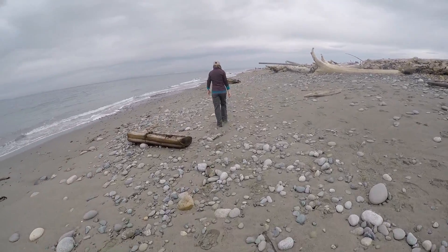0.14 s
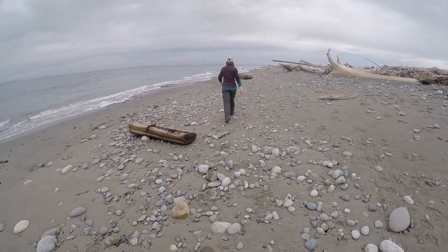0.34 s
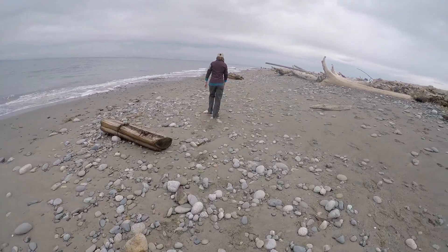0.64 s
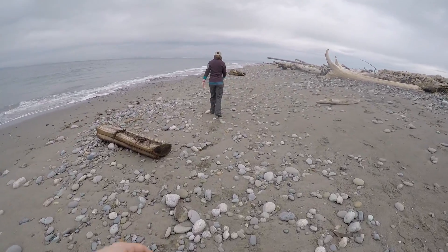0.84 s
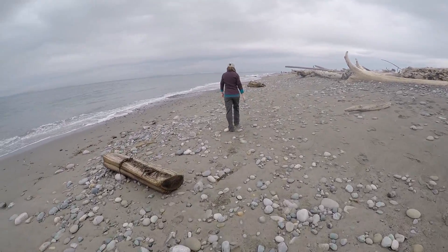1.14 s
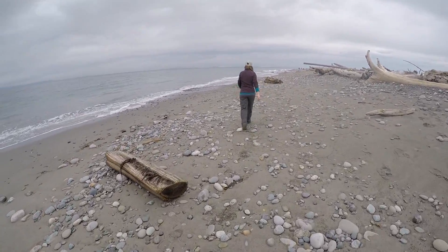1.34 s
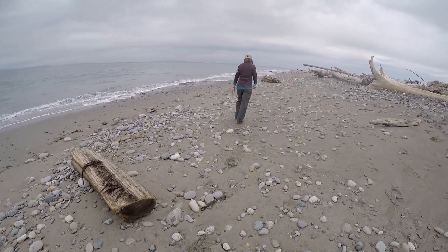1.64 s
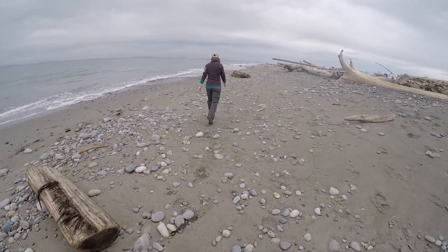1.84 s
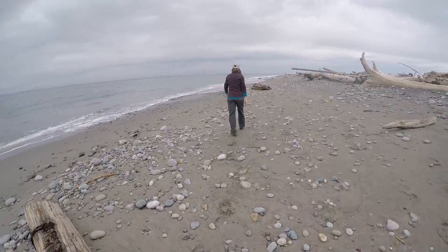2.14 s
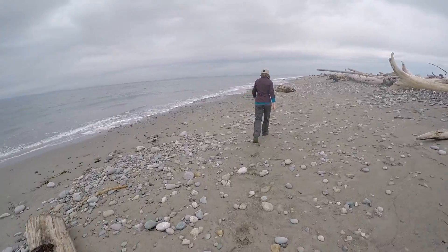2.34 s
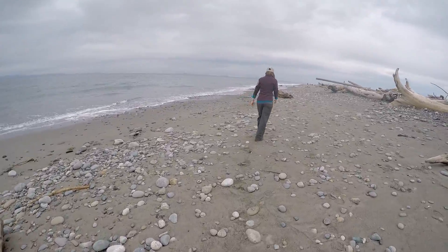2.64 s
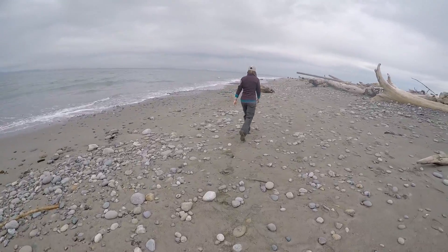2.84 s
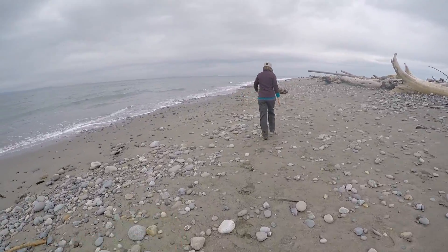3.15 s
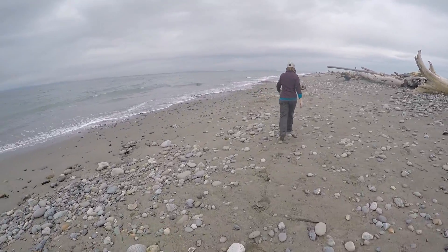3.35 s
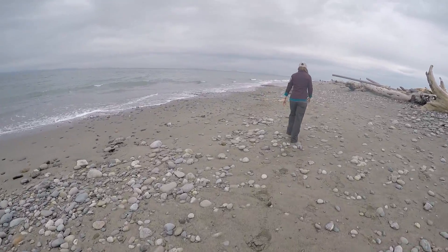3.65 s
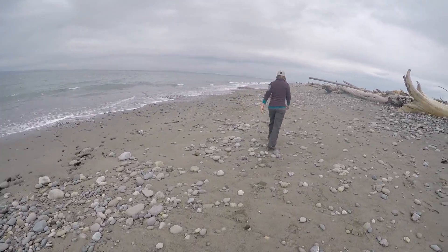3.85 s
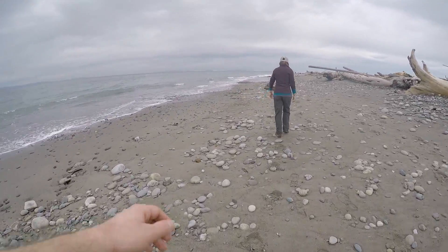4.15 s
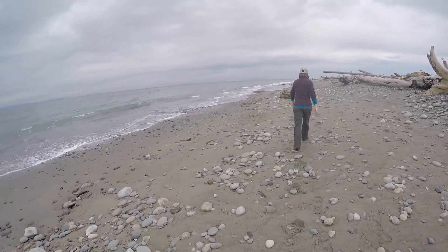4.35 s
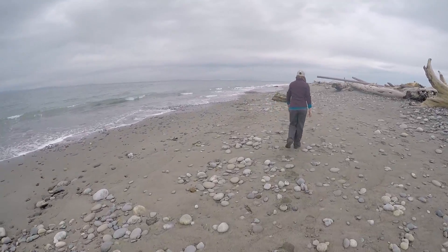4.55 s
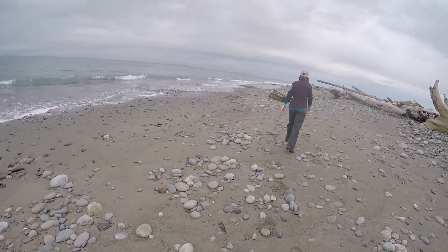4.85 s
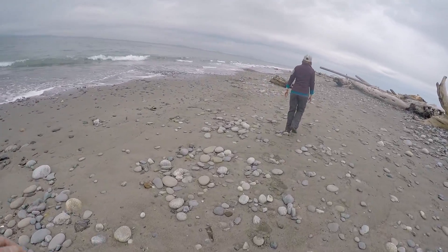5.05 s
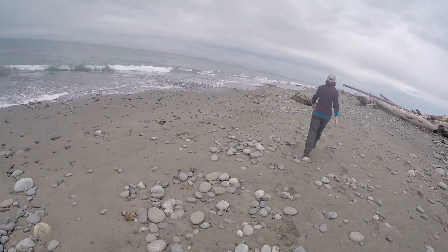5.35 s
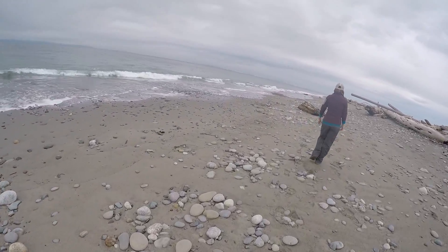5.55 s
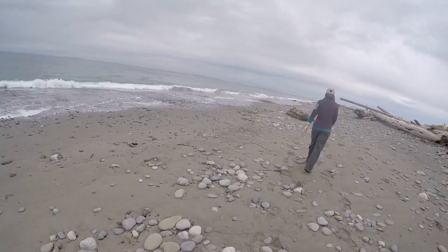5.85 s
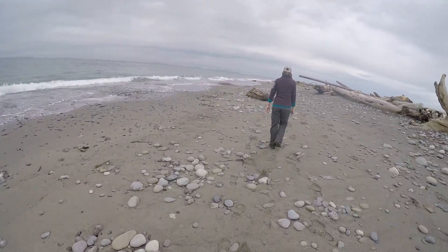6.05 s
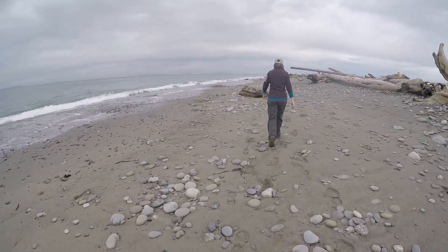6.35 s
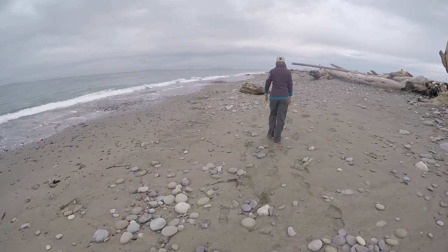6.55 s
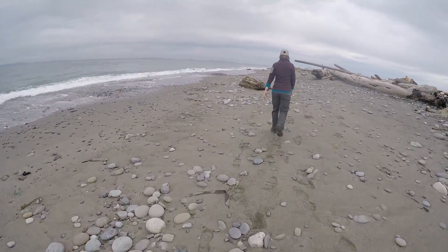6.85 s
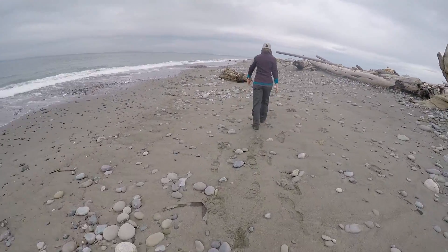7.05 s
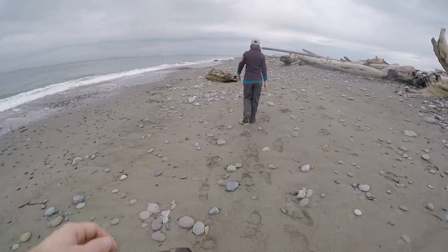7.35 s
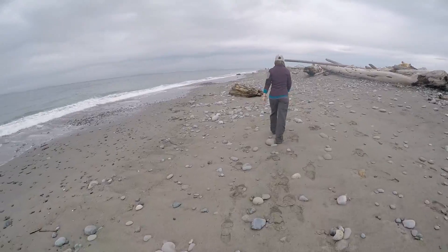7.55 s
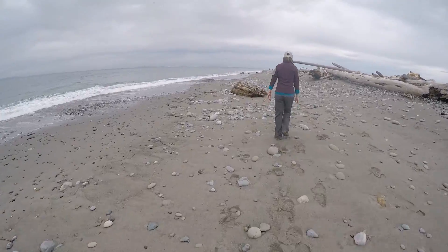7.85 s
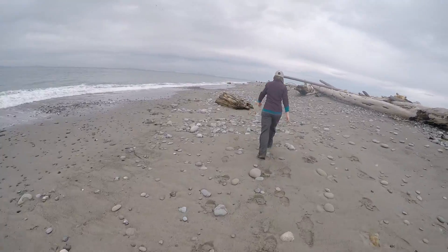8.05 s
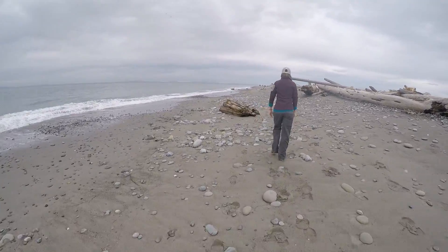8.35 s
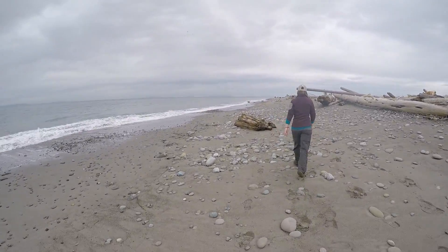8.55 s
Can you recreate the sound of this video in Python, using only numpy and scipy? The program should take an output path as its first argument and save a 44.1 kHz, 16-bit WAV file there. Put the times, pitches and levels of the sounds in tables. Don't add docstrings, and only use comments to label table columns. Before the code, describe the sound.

A walker's camera case knocks, wobbles and ticks with every step on a sand and pebble beach as a wave breaks and fizzes.

```python
import sys
import numpy as np
from scipy import signal
from scipy.fft import rfft, irfft
from scipy.io import wavfile
from scipy.ndimage import uniform_filter1d

SR = 44100
rng = np.random.default_rng(int(sys.argv[2]) if len(sys.argv) > 2 else 0)


def store_wav(level_fs):
    pcm = np.round(np.clip(np.atleast_2d(level_fs), -1, 1) * 32767)
    wavfile.write(sys.argv[1], SR, pcm.T.astype(np.int16))


def invert_db(level):
    return 10 ** (np.asarray(level, dtype=float) / 20)


N = 384111


def rms_one(x):
    return x / np.sqrt(np.mean(x ** 2) + 1e-20)


def in_time(rows):
    s, *columns = np.transpose(rows)
    return [np.interp(np.arange(N) / SR, s, column) for column in columns]


def drift(rate_hz):
    r = np.exp(-80 * np.pi * rate_hz / SR)
    slow = signal.lfilter([1], [1, -2 * r, r * r], rng.standard_normal(N // 40 + 2002))
    slow = rms_one(slow[2000:])
    return np.interp(np.arange(N) / 40, np.arange(len(slow)), slow)


def band(x, low_hz, high_hz):
    return signal.sosfilt(signal.butter(2, [low_hz, high_hz], "band", fs=SR, output="sos"), x)


def shaped(x, points):
    hz = np.maximum(np.arange(N // 2 + 1) * SR / N, 1)
    at_hz, db = np.transpose(points)
    gain = invert_db(np.interp(np.log(hz), np.log(at_hz), db))
    return irfft(rfft(x) * gain, N)


def ring(clicks, hz, t60_s):
    r = invert_db(-60 / (t60_s * SR))
    w = 2 * np.pi * hz / SR
    return signal.lfilter([0, np.sin(w)], [1, -2 * r * np.cos(w), r * r], clicks + 1e-18)


def struck(times, groups, group_db, contact_s, spread_db):
    out, sign = np.zeros(N), 1
    for modes, db in zip(groups, group_db):
        for hz, mode_db, t60_s in modes:
            sign = -sign
            start = times + 0.2 * contact_s * rng.random(len(times))
            strength = invert_db(db + mode_db + spread_db * rng.standard_normal(len(times)))
            clicks = np.zeros(N)
            np.add.at(clicks, (start * SR).astype(int), sign * strength)
            out += ring(clicks, hz, t60_s) - ring(clicks, hz, 3.07 * contact_s)
    return out


def swells(times, dbs, width_s):
    t = np.arange(0, N, 40) / SR
    bells = invert_db(dbs)[:, None] * np.exp(-((t - times[:, None]) / width_s) ** 2 / 2)
    return np.interp(np.arange(N) / SR, t, bells.sum(axis=0))


def case(x):
    # pitch_hz [Hz], width_hz [Hz], level_db [dB]
    resonances = [(590, 200, -19.5), (781, 59, -5), (965, 1130, -14.5), (1830, 178, 6.5), (2333, 174, -1.5),
                  (2697, 80, -0.5), (3500, 236, 0.5), (4190, 506, -5.5), (4490, 420, -18), (5300, 180, -42),
                  (6250, 960, -21), (8140, 670, -26), (8800, 64, -45), (10180, 1380, -12.5),
                  (13500, 670, -18)]
    # pitch_hz [Hz], level_db [dB]
    leak = [(200, -10.5), (1000, -19.5), (1230, -17), (1500, -4), (3000, -17.5), (5000, -18), (9000, -51.5),
            (15000, -23)]
    out = shaped(x, leak)
    for k, (hz, width_hz, db) in enumerate(resonances):
        r = np.exp(-np.pi * width_hz / SR)
        g = (1 - r * r) / 2 * invert_db(db) * (-1) ** k
        out += signal.lfilter([g, 0, -g], [1, -2 * r * np.cos(2 * np.pi * hz / SR), r * r], x)
    notch = signal.iirnotch(4020, 4020 / 120, fs=SR)
    return out - 0.58 * (out - signal.lfilter(*notch, out))


def surf():
    # start_s [s], level_db [dB]
    wave = [(0.0, -55), (0.48, -52.5), (0.9, -55.5), (2.52, -59), (3.13, -63), (3.71, -57.5), (4.4, -55.5),
            (4.6, -51), (4.8, -49.5), (5.31, -47.5), (5.6, -46), (6.02, -48), (6.55, -47.5), (7.08, -47.5),
            (8.39, -51.5), (8.71, -51.5)]
    # middling_db [dB], share of its swing [ratio], lag_s [s], far_sea_db [dB]
    layers = [
        (-50.5, 1.18, 0.001, -66.5),
        (-58, 1.55, 0.35, -64),
        (-59.5, 1.5, 0.0041, -70),
        (-74.5, 1.6, 0.33, -99),
    ]
    # start_s [s], level_db [dB]
    fizz = [
        (0, -2),
        (4.4, 0.5),
        (4.7, 5.5),
        (5.3, 3.5),
        (5.7, 2.5),
        (6.2, 3),
        (6.9, -1.5),
        (7.2, -5),
        (7.8, -0.5),
        (8.71, 8),
    ]
    fizz_shares = [0.042, 0.18, 0.54, 0.47]
    # start_s [s], level_db [dB]
    crests = [
        (4.55, 1.8),
        (5.25, 4.0),
        (7.4, 2.9),
        (8.3, 2.5),
    ]
    crest_shares = [0.24, 0.094, .4, 0.93]
    bands_hz = [(1494, 3590), (143, 1258), (3950, 7950), (8100, 18000)]
    t = np.arange(N) / SR
    crest_db = np.zeros(N)
    for s, db in crests:
        age = np.maximum(t - s, 0)
        crest_db += db * (1 - np.exp(-age / 0.12)) * np.exp(-age / 0.7)
    fizz_db = in_time(fizz)[0]
    vigour = in_time(wave)[0] + 50
    out = np.zeros(N)
    for layer, fizzy, misty, (low, high) in zip(layers, fizz_shares, crest_shares, bands_hz):
        mid_db, share, lag_s, far_db = layer
        late = np.interp(t - lag_s, t, vigour)
        late = uniform_filter1d(late, max(int(1.6 * lag_s * SR), 1), mode="nearest")
        near_db = mid_db + share * late + misty * crest_db + fizzy * fizz_db
        level = np.hypot(invert_db(near_db), invert_db(far_db))
        flicker_db = 0.5 * drift(0.11) + 0.76 * drift(19.0) + 0.91 * drift(2.4)
        hiss = band(band(rng.standard_normal(N), low, high), 0.81 * low, 1.1 * high)
        out += rms_one(case(hiss)) * level * invert_db(flicker_db)
    return out


def pebbles():
    # start_s [s], peak_db [dB], pitch_hz [Hz]
    pebble_hits = [(1.514, -38, 1650), (1.516, -38, 3470), (1.998, -39.5, 2310), (2.6269, -50, 2640),
                   (2.852, -46, 2340), (2.908, -43, 2370), (2.237, -42, 2520), (3.778, -49, 1100),
                   (.6635, -42, 2570), (1.19, -41, 2450), (1.75, -43, 2400), (2.761, -47, 2600),
                   (2.77, -42, 1920), (2.7705, -48, 2600), (3.842, -37, 2400), (7.056, -39, 2570),
                   (3.145, -45, 1900), (3.347, -45, 2250), (1.4378, -45, 2190), (1.4662, -42, 2320),
                   (1.5355, -42, 3430), (1.5352, -36, 1760), (1.5805, -37, 1800), (1.6155, -36, 3600),
                   (3.126, -44, 2350), (3.247, -44, 2340), (3.261, -43, 2380), (3.268, -46, 2300),
                   (3.334, -49, 2250), (3.237, -50, 2300), (3.298, -43, 2330), (1.472, -42, 2500),
                   (1.484, -42, 2400), (1.495, -48, 2500), (1.523, -39, 2200), (1.545, -44, 2000),
                   (4.325, -43, 2350), (1.269, -47, 4180), (8.446, -46, 2450), (3.5267, -37.5, 2370),
                   (3.5448, -37, 2280), (3.5576, -35.5, 3500), (3.5902, -47, 2360), (4.6089, -38, 2360),
                   (6.574, -33, 2280), (6.7281, -39, 2240), (8.4367, -43, 2390), (8.455, -38, 2590)]
    out = np.zeros(N)
    for s, db, hz in pebble_hits:
        out += struck(np.array([s]), [[(hz, 0, 0.018)]], [db], 0.00034, 0)
    scatter = (rng.random(N) < 40 / SR) * invert_db(-52.0 + 0.79 * rng.standard_normal(N))
    return out + ring(scatter, 2335, 0.019)


def scuffs():
    # start_s [s], peak_db [dB], length_s [s], crunch_hz [Hz],
    # grit_db [dB]
    slips = [(0, -55, 0.078, 2160, 3), (0.112, -46, 0.015, 710, -27), (0.117, -47, .025, 1100, -30),
             (0.113, -43, 0.018, 1810, -30), (0.657, -43, 0.0087, 1200, -30), (2.798, -56, 0.17, 2380, -25),
             (7.046, -42, 0.011, 1200, -30), (0.457, -56, 0.069, 2260, -16), (1.437, -52, 0.032, 2290, -19),
             (1.464, -46, .035, 2400, -22), (1.514, -37.5, 0.015, 2300, 0.5), (1.529, -39, .008, 2700, 0),
             (1.538, -41, 0.022, 2070, -3), (1.612, -48, 0.028, 2580, -10), (1.66, -58, 0.031, 3500, -20),
             (1.742, -37, 0.0081, 1240, -28), (3.207, -51, 0.12, 1500, -25), (3.33, -55, 0.032, 1900, -20),
             (3.331, -50, 0.048, 600, -30), (6.359, -29.5, 0.022, 583, -30), (1.574, -44, 0.037, 2280, -5),
             (1.64, -49, 0.033, 2200, -8), (1.891, -48, 0.054, 2380, -24), (2.099, -58, 0.035, 7400, 5),
             (2.1, -64, .03, 12500, -20), (2.56, -54, 0.11, 2300, -12), (3.174, -48, 0.069, 2180, -6),
             (3.233, -44, 0.037, 560, -24), (3.252, -46, 0.018, 520, -26), (3.318, -43, 0.039, 300, -31),
             (3.232, -48.5, 0.049, 2400, -21), (3.543, -44.5, 0.07, 2290, -10),
             (3.857, -49.5, 0.097, 2280, -18), (3.94, -49.5, 0.098, 2400, -14),
             (6.731, -40, 0.013, 2090, -10), (8.44, -47, 0.047, 2510, -4)]
    size = invert_db(3.2 * np.minimum(rng.exponential(1, N), 4))
    grains = size * rng.choice([-1, 1], N) * (rng.random(N) < 2500 / SR)
    grit = case(band(band(grains, 4100, 11000), 1500, 11000))
    grit_top = signal.cheby2(10, 30, 1.03 * 8500, fs=SR, output="sos")
    fine = rms_one(signal.sosfilt(grit_top, grit))
    out = np.zeros(N)
    for s, db, length_s, hz, grit_db in slips:
        i = int(s * SR)
        length_s = max(length_s, 0.008)
        t = np.arange(min(int(3 * length_s * SR), N - i)) / SR
        span = slice(i, i + len(t))
        shape = invert_db(db - 8.0) * np.minimum(t / 0.0012, 1) * np.exp(-(t / length_s) ** 2)
        coarse = rms_one(band(grains[span], hz * 0.87, hz * 1.15))
        out[span] += shape * (coarse + invert_db(grit_db) * fine[span])
    return out


def ticks():
    # start_s [s], peak_db [dB]
    snaps_home = [(0.137, -26.5), (0.53, -23.5), (0.704, -29.5), (1.1887, -43), (1.2037, -23.5),
                  (1.615, -34), (1.714, -46), (2.161, -36), (2.262, -25), (2.6579, -28), (2.813, -30),
                  (3.2804, -45), (3.2982, -25), (3.718, -24), (4.2517, -30), (4.354, -24.5), (4.8045, -25),
                  (5.394, -24.5), (5.9514, -36), (6.4615, -27.5), (6.9136, -24), (7.054, -34), (7.548, -25),
                  (7.861, -34), (7.968, -35), (8.5409, -24.5)]
    # start_s [s], peak_db [dB]
    grazes = [(.659, -37), (0.6648, -32), (.701, -44), (1.742, -43), (1.7479, -33), (2.235, -44),
              (2.239, -38), (2.7606, -35), (2.7701, -35), (3.837, -50), (3.8422, -35), (6.4254, -34),
              (7.049, -48), (7.541, -29), (8.0506, -36), (8.058, -39)]
    # pitch_hz [Hz], level_db [dB], t60_s [s]
    latch = [
        [(2760, 1, 0.0054), (3800, -10, 0.018), (4530, -5, 0.012), (5300, -3, 0.0058), (6560, -10, 0.0072),
         (7130, -9.5, 0.011), (7700, -6, 0.007)],
        [(8800, -17, 0.0074), (9450, -11.5, 0.0074), (9910, -4, 0.0051), (10190, 2.5, 0.0044),
         (10710, -4.5, 0.0053), (11600, -14, 0.0064), (12700, -16, 0.006), (13700, -19, .009),
         (14500, -24, 0.006), (15200, -17, .004), (15800, -17, 0.0034)],
    ]
    s, db = np.transpose(snaps_home + grazes)
    low_db = np.repeat([-8, -37], [len(snaps_home), len(grazes)])
    return struck(s, latch, [db + low_db + 2.0, db + 0.5], 0.0012, 0.49)


def blows():
    # start_s [s], peak_db [dB], hollow_db [dB], upper_db [dB], thud_db [dB]
    hard = [(0.201, -38, -15, -6, -9), (0.525, -38, -5, -20, -20), (0.665, -35.5, -13, -16, -14),
            (1.19, -35, -18, -27, -18), (1.269, -23, -18.5, -3.5, -12), (1.75, -34, -24, -23, -8),
            (2.137, -30, -7, -19, -11), (2.158, -18, -16.5, -9.5, -15.5), (2.239, -36, -25, -13, -14),
            (2.313, -34.5, -15, -5.5, -9.5), (3.012, -38.5, -4, -33, -16), (3.281, -28, -34, -31, -16),
            (3.376, -31, -15.5, -6, -9.5), (3.714, -26.5, -6.5, -10, -34),
            (3.843, -31.5, -24, -10.5, -15.5), (4.23, -29, -10, -13, -19), (4.547, -29, -15.5, -5.5, -12),
            (5.873, -25.5, -2.5, -29, -21), (6.370, -27, -26, -7, -1), (6.591, -28.5, -15.5, -3, -11),
            (7.444, -36.5, -6, -6, -20), (7.606, -31, -12.5, -2, -4.5), (7.965, -34, -3.5, -11, -27),
            (8.577, -30, -36, -11, -10.5)]
    # start_s [s], peak_db [dB], hollow_db [dB], thud_db [dB]
    light = [(0.06, -44, -13, -8), (1.239, -47, -0.5, -3), (1.514, -45, -24, -15), (1.632, -41.5, -5, -21),
             (1.664, -45.5, -5, -9), (2.289, -37, -9.5, -8), (2.64, -46, -3.5, -18),
             (2.76, -39.5, -28, -19), (2.772, -39, -11, -7), (3.138, -47, -9, -5), (3.182, -44, -2.5, -5),
             (3.247, -48, -13, 5), (3.31, -47, -2, 7), (3.347, -39.5, -10, -2.5), (3.684, -52, 2, -2),
             (4.354, -40, -16, -18), (4.405, -47.5, -8, 2), (4.292, -54, -8, 8), (4.325, -47, -25, -15),
             (3.338, -51, -3, 1), (5.954, -40, -24, -19), (6.428, -32.5, -18, -15),
             (6.547, -40.5, -10, 0.5), (6.977, -48.5, 4, -15), (7.055, -37, -13, -7.5),
             (7.543, -35, -26, -10), (8.053, -36, -20, -10), (8.507, -42, -29, -18), (8.566, -44, 2, -1)]
    return np.transpose(hard + [(s, db, hollow, -11, thud) for s, db, hollow, thud in light])


def shake():
    # start_s [s], level_db [dB]
    wind = [(0, -51.5), (.46, -56), (.97, -55.5), (1.65, -54), (2.08, -56), (2.47, -54), (3.1, -56),
            (3.36, -52), (3.42, -58), (3.8, -48.5), (4.7, -57.5), (5.07, -50.5), (5.77, -51.5), (6.28, -50),
            (6.5, -49), (7.57, -48), (7.74, -53.5), (8.71, -54)]
    # pitch_hz [Hz], level_db [dB per Hz]
    rumble_colour = [(34, -26), (58, 6), (121, -8.5), (210, -25), (265, -24), (400, -35.5), (520, -66),
                     (880, -120)]
    # middle_s [s], level_db [dB], swing_hz [Hz]
    lurches = [(0.149, -25.5, 29), (0.642, -19.5, 37), (0.686, -39, 13.5), (1.14, -24.5, 51),
               (1.156, -22, 29), (1.209, -35.5, 13), (1.54, -25, 41), (1.585, -26.5, 37), (1.636, -33, 59),
               (2.172, -16.5, 26), (2.222, -29, 20), (2.664, -22, 24.3), (3.154, -28.5, 39),
               (3.662, -23, 45), (3.703, -25.5, 50), (4.322, -24, 19.8), (4.664, -23.5, 34.4),
               (4.78, -25, 36.6), (5.173, -23.5, 36.5), (5.674, -23.5, 31), (6.177, -28.5, 61),
               (6.39, -18, 24), (6.673, -26, 31), (6.924, -22, 36), (7.676, -30, 32), (7.916, -31, 18),
               (7.971, -19, 32), (8.035, -26.5, 22), (8.682, -32.5, 29)]
    # middle_s [s], level_db [dB], swing_hz [Hz]
    swings = [(0.044, -34, 21.5), (0.55, -26, 28), (1.108, -38, 17.4), (1.655, -25.5, 36), (1.724, -34, 22),
              (2.118, -34.5, 32), (3.201, -32.5, 22), (3.293, -37.5, 14.4), (3.745, -26, 22),
              (4.158, -25.5, 39), (4.22, -31.5, 18.5), (4.863, -30.5, 24), (5.372, -32, 18.4),
              (5.83, -39, 31), (5.901, -26, 23.5), (5.972, -39, 14.4), (6.998, -32, 29), (7.444, -30, 25.4),
              (8.184, -27.5, 31.3), (8.414, -31, 43), (8.508, -32, 20), (8.692, -28.5, 38.4)]
    rumble = rms_one(shaped(rng.standard_normal(N), [(35, -27)] + rumble_colour + [(700, -61.0)]))
    sway_colour = [(10, -4), (20, -4.5), (40, 5.5), (60, -58), (100, -68)]
    sway = rms_one(shaped(rng.standard_normal(N), sway_colour))
    moves = [(*row, 0.46) for row in lurches] + [(*row, 0.87) for row in swings]
    move_s, move_db, _, _ = np.transpose(moves)
    hit_s, hit_db, _, _, thud_db = blows()
    unrest = invert_db(in_time(wind)[0])
    unrest += swells(move_s, move_db - 27.5, 0.051)
    unrest += swells(hit_s + 0.015 / 2, hit_db + thud_db - 10, 0.015)
    out = np.sqrt(unrest) * invert_db(-20.0) * sway
    for s, db, hz, turns in moves:
        phase = rng.uniform(0, 2 * np.pi)
        reach_s = 3 * turns / hz
        at = np.arange(max(int((s - reach_s) * SR), 0), min(int((s + reach_s) * SR), N))
        cycles = (at / SR - s) * hz
        bell = np.exp(-(cycles / turns) ** 2 / 2)
        out[at] += invert_db(db) * bell * np.cos(2 * np.pi * cycles + phase)
    return out + unrest * invert_db(-2.5 + 2.0 * drift(22.0)) * rumble


def slam():
    # pitch_hz [Hz], level_db [dB], t60_s [s]
    flexed = [(147, -7, 0.023), (125, -7, 0.024), (300, -5, .012), (560, -4, 0.013), (1004, 3, 0.016),
              (1445, -11, 0.038), (2400, -5, 0.017), (2820, -13, 0.013), (3450, -11, 0.011)]
    return struck(np.array([6.369]), [flexed], [-13], 0.00275, 0)


def snap(times, dbs):
    clicks = np.zeros(N)
    np.add.at(clicks, (times * SR).astype(int), invert_db(dbs))
    decay = signal.lfilter([1], [1, -invert_db(-60 / (0.013 * SR))], clicks + 1e-18)
    return band(band(rng.standard_normal(N) * decay, 270, 2000), 190, 2200)


def knocks():
    # pitch_hz [Hz], level_db [dB], t60_s [s]
    mount = [
        [(344, -7.5, 0.0097), (575, -1.5, 0.013), (609, -14, 0.086), (744, -5.5, 0.021), (800, -15.5, 0.016)],
        [(1003, -9.5, 0.018), (1112, -6, 0.023), (1264, 0.5, 0.01)],
        [(1465, -2, 0.0099), (1650, -4, 0.015), (1800, -9, 0.006)],
        [(2100, -4, 0.016), (2390, -7, 0.025), (2920, -5, 0.0096), (3400, -10.5, 0.019), (4830, -9.5, 0.011)],
    ]
    s, db, hollow, upper, thud = blows()
    crack = -35 + (db + 26.5)
    group_db = [db + hollow + 14.5, db + 5.5, db + upper + 15.5, crack]
    rings = struck(s - 0.001, mount, group_db, 0.0022, 1.5)
    thud_modes = [(84.0, 6.0, 0.043), (141, 9.0, 0.017), (243, 5.5, 0.0069)]   # Hz, dB, t60 s
    jolt = struck(s + 0.0021, [thud_modes], [db + thud + 8.5], 0.0027, 0.94)
    return rings + jolt + snap(s, db - 4.5)


def scene():
    beach = surf() + pebbles() + scuffs()
    handling = ticks() + shake() + slam() + knocks()
    return (beach + handling)[None, :]


def roll_off(x):
    return signal.sosfilt(signal.butter(12, 16600, fs=SR, output="sos"), x)


def record(dry):
    hiss = invert_db(-72) * rms_one(band(rng.standard_normal(N), 3700, 13500))
    top_cut = signal.cheby2(10, 40, 17200, fs=SR, output="sos")
    mix = signal.sosfilt(top_cut, dry + hiss)
    return roll_off(mix)


dry = scene()
out = record(dry)
store_wav(out)
```